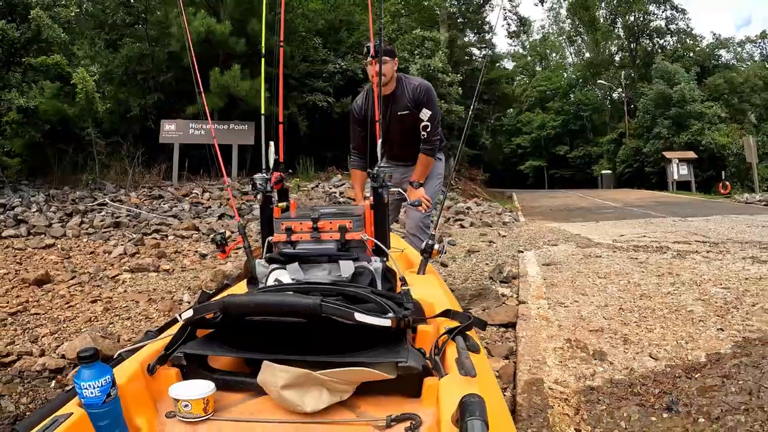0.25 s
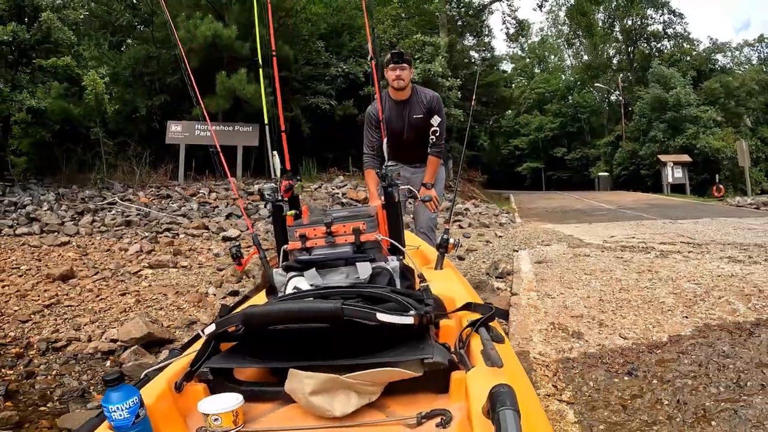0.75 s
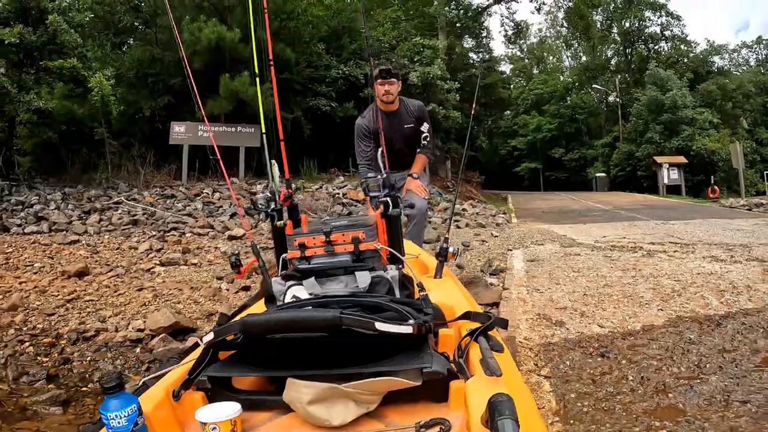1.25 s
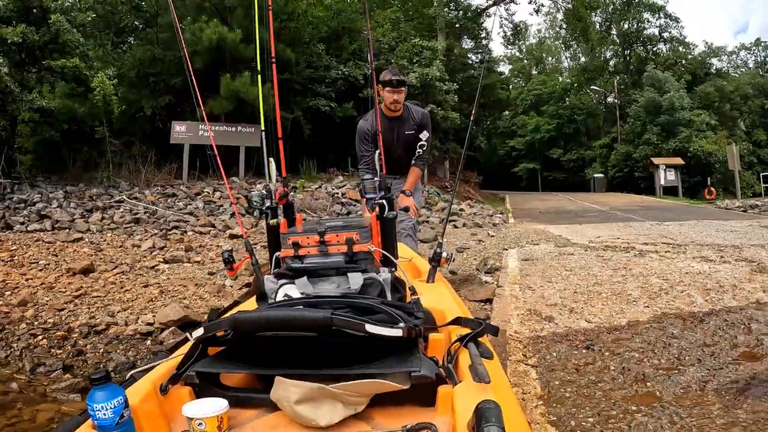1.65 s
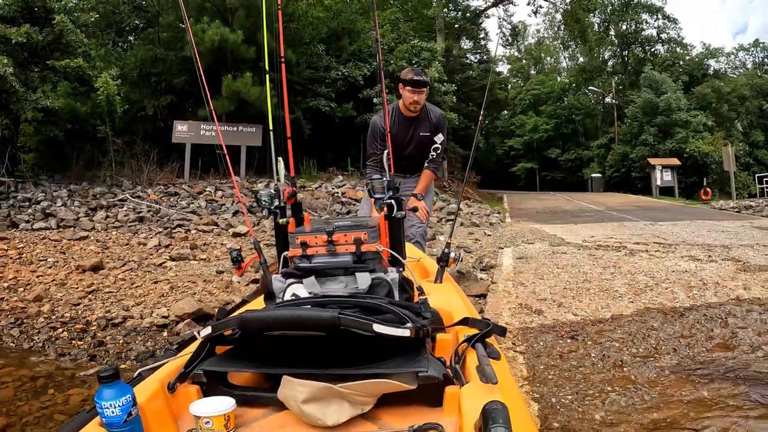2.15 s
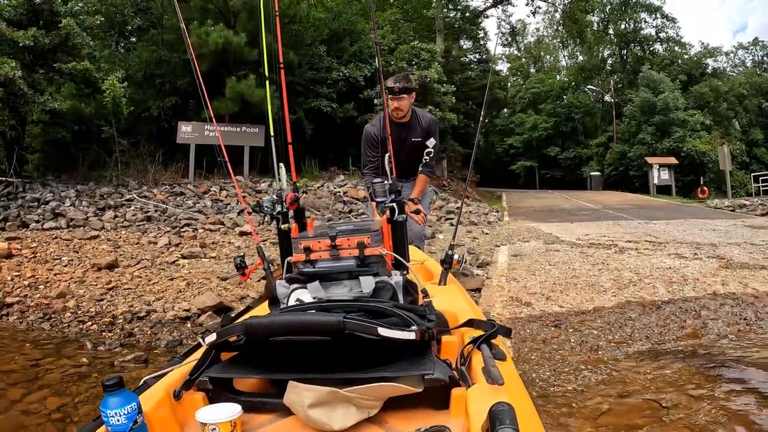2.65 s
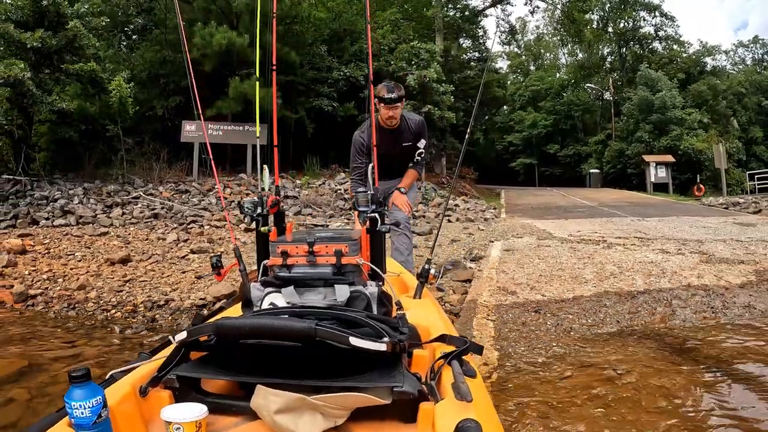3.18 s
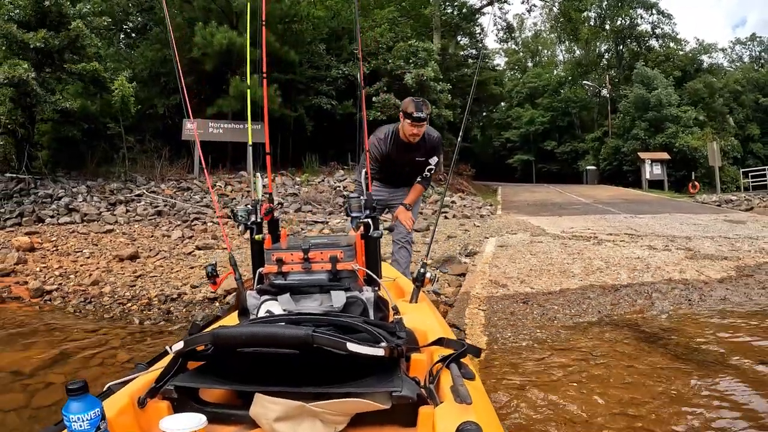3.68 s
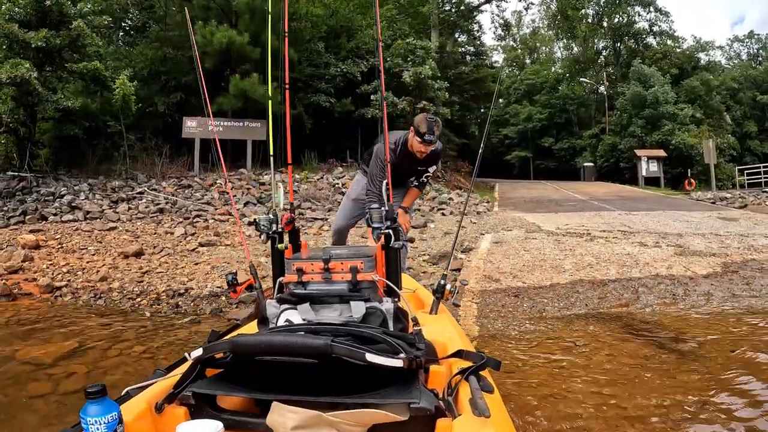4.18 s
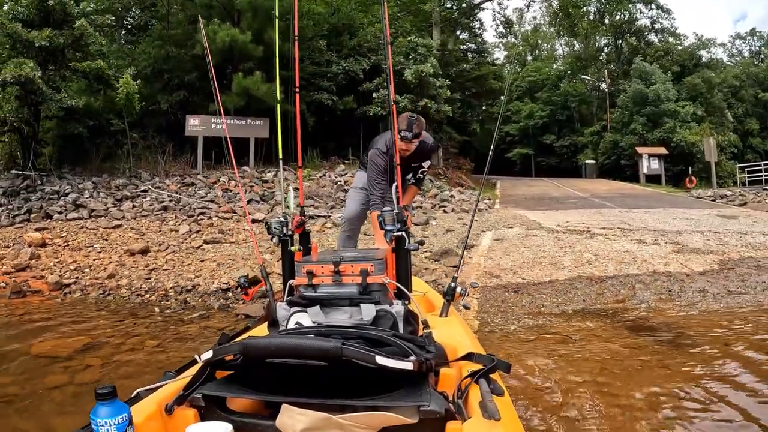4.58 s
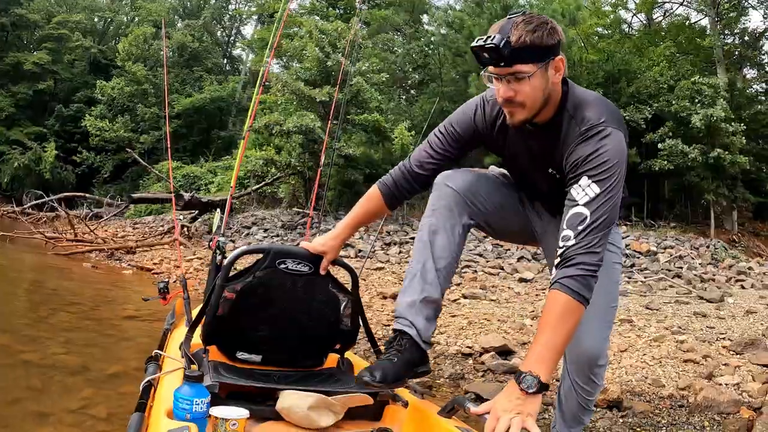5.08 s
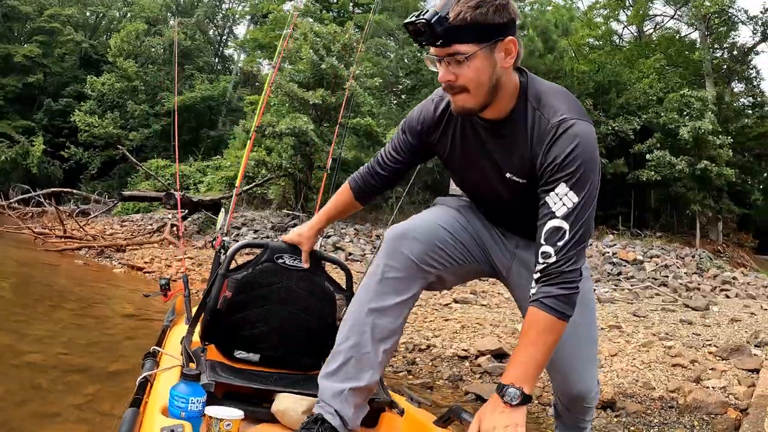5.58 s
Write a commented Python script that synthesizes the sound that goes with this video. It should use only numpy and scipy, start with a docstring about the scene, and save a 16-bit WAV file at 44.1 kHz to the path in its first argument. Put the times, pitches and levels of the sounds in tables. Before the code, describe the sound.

A loaded plastic kayak scrapes over gravel with hollow booms and clacking gear, loudest in the first second. It quietens as it slides into shallow water, which slops and plinks around wading feet between scattered knocks. Near the end a foot thumps aboard and the gear rattles. Faint insects, a cricket, a distant low hum and light wind sit behind, heard outdoors from a microphone on the hull.

```python
"""Grinding and hollow bumps: a loaded plastic kayak is dragged over gravel into shallow water.
Stones shake the modes of hull and deck, gear clacks, a foot thumps aboard.
Water slops round the wading feet and its bubbles plink.
Behind are a cricket, an insect chorus, a far low hum and light wind on the hull-mounted microphone."""
import sys
import numpy as np
from scipy.fft import rfft, irfft, next_fast_len
from scipy.io import wavfile
from scipy.ndimage import map_coordinates

SR = 44100
rng = np.random.default_rng(int(sys.argv[2]) if len(sys.argv) > 2 else 0)


def waveform_to_disk(signal):
    """Save audio, clipped to [-1, 1], as 16-bit WAV at the path in sys.argv[1]."""
    frames = np.transpose(np.atleast_2d(signal))
    scaled = np.clip(frames, -1, 1) * 32767
    samples = np.round(scaled).astype(np.int16)
    wavfile.write(sys.argv[1], SR, samples)


N = 257103

# steady load on the hull, two consecutive spans: time_s, boom_db, grind_db
HULL_LOAD = [
    [(0.0, -32.5, -54), (0.36, -23.5, -35.5), (0.64, -27, -42.5), (0.83, -31.5, -36.5), (1.04, -48.5, -59),
     (1.45, -59, -74), (1.71, -59.5, -78), (2.01, -50.5, -58), (2.61, -55.5, -75.5), (2.77, -47, -54.5),
     (3.04, -54, -67.5), (3.42, -60.5, -70), (3.67, -50, -59), (4.09, -54.5, -71), (4.5, -51, -56),
     (4.81, -40.5, -57.5)],
    [(4.81, -45.5, -56), (4.906, -47.5, -57.5), (5.044, -42.5, -55), (5.328, -43.5, -69), (5.428, -44, -57),
     (5.516, -40, -57), (5.74, -44.5, -52.5), (5.83, -43.5, -49)],
]
# hull lurching over stones: start_s, boom_db, grind_db, rise_s, boom_t60_s, mic_jolt_db
HULL_LURCHES = [(0.027, 1, -21.5, 0.0067, 0.53, -23), (0.099, -12.5, -25, 0.013, 0.11, -21),
                (0.249, -18, -33.5, 0.012, 0.23, -25), (0.336, -2.5, -28.5, 0.012, 0.3, -29),
                (0.384, -13.5, -27.5, 0.015, 0.46, -36.5), (0.432, -8.5, -19.5, 0.0086, 0.25, -33.5),
                (0.498, -21, -31.5, 0.0066, 0.28, -36), (0.644, -13, -28, 0.012, 0.22, -40.5),
                (0.707, 1.5, -15.5, 0.0047, 0.25, -36.5), (0.742, 0.5, -25.5, 0.012, 0.22, -38),
                (0.789, -14.5, -42, 0.0048, 0.2, -37), (0.96, -17.5, -35, 0.01, 0.31, -35),
                (1.358, -50, -52.5, 0.01, 0.27, -53), (1.72, -50, -65, 0.012, 0.25, -42.5),
                (1.99, -34, -62, 0.012, 0.25, -56), (2.066, -56, -63, 0.012, 0.21, -50),
                (2.168, -40, -69, 0.015, 0.2, -35.5), (2.449, -38, -74, 0.0091, 0.17, -41.5),
                (2.611, -13.5, -48, 0.021, 0.4, -32.5), (2.741, -36.5, -61, 0.0069, 0.23, -49.5),
                (2.85, -27, -42.5, 0.005, 0.4, -50.5), (2.999, -36, -71, 0.012, 0.49, -46.5),
                (3.148, -40, -48.5, 0.01, 0.16, -43.5), (3.479, -39, -45.5, 0.033, 0.75, -49.5),
                (3.923, -21, -40.5, 0.0043, 0.75, -51), (3.999, -34.5, -38, 0.013, 0.15, -51),
                (4.049, -36, -62, 0.012, 0.21, -51), (4.209, -16, -35, 0.014, 0.35, -52.5),
                (4.244, -26, -43.5, 0.0093, 0.2, -47.5), (4.337, -39, -42, 0.0052, 0.3, -49),
                (4.496, -47, -50, 0.011, 0.086, -57.5), (4.556, -10.5, -58, 0.0091, 0.25, -48.5),
                (4.639, -23.5, -49.5, 0.012, 0.25, -34.5), (4.698, -13.5, -63, 0.0086, 0.35, -34.5),
                (4.738, -19.5, -40, 0.012, 0.25, -32.5), (4.778, -15.5, -36, 0.0078, 0.39, -30.5),
                (4.939, -27.5, -43.5, 0.012, 0.53, -32.5), (5.169, -25, -46.5, 0.023, 0.38, -50.5),
                (5.309, -26, -66, 0.017, 0.23, -51.5), (5.401, -12.5, -28.5, 0.012, 0.23, -45.5),
                (5.449, -10, -31, 0.0076, 0.16, -49), (5.587, -18.5, -33.5, 0.013, 0.18, -49),
                (5.789, -20, -29.5, 0.016, 0.25, -42.5)]
# blows on the hull: start_s, level_db, panel_hz, t60_s, rap_relative_db
HULL_BLOWS = [(0.024, 4, 322, 0.034, -21), (0.044, -3.5, 181, 0.15, -18), (0.101, -10, 62.3, 0.3, -7),
              (0.257, -15.5, 61.9, 0.23, -2), (0.353, -12.5, 97.2, 0.12, -13),
              (0.372, -3.5, 119.3, 0.16, -22), (0.435, -8, 237.4, 0.19, -5), (0.5, -15, 216, 0.21, -17),
              (0.636, -15.5, 125.2, 0.11, -1), (0.708, -0.5, 189, 0.12, 1), (0.745, -7, 172, 0.18, 10),
              (0.762, -10, 75.1, 0.11, -26), (0.797, -8.5, 102, 0.18, -30), (0.977, -22.5, 62.3, 0.08, -17),
              (2.06, -31, 201, 0.14, -17), (2.616, -11, 62.1, 0.39, -22), (2.63, -14, 87.6, 0.12, -41),
              (2.665, -21.5, 134, 0.085, -36), (2.854, -33, 463, 0.16, -23),
              (3.133, -28.5, 158, 0.061, -13), (3.533, -31.5, 465, 0.037, 14.5),
              (3.931, -24.5, 490, 0.12, -26), (3.966, -35.5, 72.7, 0.11, -12),
              (3.998, -22.5, 468, 0.047, -17), (4.216, -29, 188, 0.062, -13),
              (4.238, -27.5, 96.9, 0.1, -25), (4.558, -19, 194.5, 0.23, -23), (4.597, -17, 179, 0.11, -37),
              (4.643, -23, 133, 0.19, -16), (4.7, -23.5, 62.2, 0.11, -34), (4.745, -15.5, 98, 0.14, -34),
              (4.769, -11.5, 62.6, 0.18, -13), (4.8, -18.5, 91, 0.055, -24),
              (4.946, -23.5, 65.5, 0.53, -19), (4.96, -29, 61.9, 0.15, -18), (5.188, -34.5, 223, 0.21, -24),
              (5.309, -24, 315.4, 0.11, -5), (5.349, -24.5, 307, 0.11, -26), (5.407, -9, 95, 0.12, 2.5),
              (5.434, -7.5, 159.3, 0.075, -16), (5.459, -18, 246, 0.087, 7.5),
              (5.474, -24.5, 160, 0.24, -13), (5.596, -15.5, 163, 0.13, -4), (5.8, -23.5, 190, 0.12, -16)]
# resonances of hull, deck and pebbles: centre_hz, width_hz, gain_db
HULL_MODES = [(68.5, 51, -3.5), (105.4, 71, -1), (187.3, 59.3, -1), (244.3, 81, -4.5), (310, 69, -8.5)]
DECK_MODES = [(369.3, 80, 1), (514, 79, 1), (604.5, 101, -2), (803, 247, -13.5), (981, 170, -11),
              (1346, 230, -18.5), (2013, 67, -19.5)]
PEBBLE_MODES = [(910, 200, 7.5), (1580, 180, -1), (2050, 130, -20.5), (2450, 150, -6), (3370, 140, -20)]
# brief dip in hull sound and wind: time_s, gain_db
RUMBLE_DIP = [(0, 0), (4.806, 0), (4.811, -24), (4.85, -12), (4.89, 0), (5.83, 0)]
# steady stir of gravel and water, two consecutive spans: time_s, slosh_db, fizz_db
STIR_FLOOR = [
    [(0.0, -61, -68), (0.2, -52, -60), (0.87, -54, -66.5), (1.02, -70, -75), (1.67, -80, -81.5),
     (2.0, -58, -67.5), (2.46, -68, -73.5), (3.21, -64.5, -69), (3.62, -60, -67.5), (4.31, -67, -65.5),
     (4.53, -68.5, -73), (4.81, -71, -72)],
    [(4.81, -59, -66), (4.932, -55, -63), (4.99, -51.5, -63), (5.078, -54.5, -63.5), (5.186, -54, -64),
     (5.44, -67, -69.5), (5.5, -78, -70), (5.624, -52.5, -61.5), (5.83, -56.5, -61)],
]
# crunches and splashes: start_s, slosh_db, fizz_db, rise_s, slosh_t60_s
STIR_BURSTS = [(0.0247, -29, -45.5, 0.036, 0.26), (0.0998, -33, -45.5, 0.0059, 0.2),
               (0.3531, -33, -54, 0.0061, 0.42), (0.4348, -36.5, -52, 0.01, 0.18),
               (0.6544, -39.5, -61.5, 0.012, 0.14), (0.7086, -18, -43.5, 0.004, 0.071),
               (0.7445, -30, -54, 0.015, 0.18), (0.9554, -32.5, -62.5, 0.0096, 0.12),
               (1.0032, -39, -56.5, 0.017, 0.11), (1.202, -50.5, -74, 0.015, 0.2),
               (1.3733, -60.5, -85, 0.0072, 0.166), (1.8092, -42.5, -62.5, 0.018, 0.24),
               (1.8612, -42, -64, 0.012, 0.19), (1.9857, -40.5, -68, 0.017, 0.35),
               (2.0594, -42, -61, 0.0095, 0.07), (2.174, -58, -72, 0.012, 0.18),
               (2.349, -52, -60.5, 0.0045, 0.12), (2.3955, -52, -63, 0.012, 0.23),
               (2.596, -40.5, -69, 0.016, 0.25), (2.9494, -41, -69, 0.011, 0.37),
               (3.1752, -66, -61, 0.0063, 0.095), (3.3563, -46.5, -58, 0.012, 0.22),
               (3.475, -31, -49, 0.014, 0.47), (3.4974, -22, -48.5, 0.015, 0.14),
               (3.532, -19, -63, 0.01, 0.16), (3.5783, -39, -67.5, 0.0069, 0.53),
               (3.9609, -37.5, -62, 0.019, 0.18), (4.0394, -44, -57, 0.012, 0.16),
               (4.217, -42, -49.5, 0.01, 0.13), (4.2944, -45, -57, 0.017, 0.5),
               (4.9611, -35, -70, 0.014, 0.18), (5.4047, -29.5, -51, 0.018, 0.18),
               (5.4465, -29, -37.5, 0.0075, 0.14), (5.5835, -31.5, -44, 0.011, 0.12),
               (5.5953, -28, -49.5, 0.0085, 0.15), (5.6501, -39, -57, 0.019, 0.066),
               (5.7673, -46.5, -71, 0.012, 0.14), (5.798, -34.5, -51, 0.019, 0.2)]
# stone and gear hits: start_s, level_db, pitch_hz, treble_relative_db, left_over_right_db,
# upper_hz, upper_relative_db, crack_relative_db
GEAR_HITS = [(0.025, -30.5, 823, 0, 6, 1570, -10, 3), (0.052, -26.5, 780, -1, -5, 1810, -2, -12.5),
             (0.098, -26.5, 667, -5.5, 10.5, 2006, -0.5, -4.5),
             (0.113, -30, 840, -6, -3.5, 1600, -4.5, -10), (0.188, -37.5, 730, 0, -4, 1810, -4, -4),
             (0.217, -28, 750, -24, -2.5, 2040, -5.5, 4.5), (0.26, -28.5, 797, -27, 10, 2130, -16, -14),
             (0.282, -33, 885, -28, 5, 1650, -16.5, -2), (0.315, -55.5, 912, 5, 7, 1990, -16, -9),
             (0.366, -27.5, 940, -11, 7.5, 2013, 2, -10), (0.403, -24, 696, -17.5, 5, 1910, -13, -3.5),
             (0.435, -16, 955, -18.5, 4, 1670, -41, -7.5), (0.501, -28, 703, -25, 3.5, 1930, -5, 1),
             (0.525, -33.5, 856, -19, 1.5, 1700, -10.5, 2),
             (0.659, -27.5, 1490, -36, 1.5, 1520, -11.5, -15),
             (0.694, -26, 1450, -21.5, 1.5, 1546, -23.5, -1.5),
             (0.707, -14, 862, -24, 1.5, 1950, -11, -1.5), (0.721, -17.5, 1030, -22, -3, 1660, -21, -6),
             (0.745, -11, 910, -20.5, 3.5, 1696, -24, -4), (0.763, -19.5, 759, -21.5, -2.5, 1900, -26, -6),
             (0.793, -33.5, 707, -22, 0.0, 2410, -1.5, -5.5), (0.804, -32.5, 735, -17.5, 3, 1970, -0.5, 4),
             (0.825, -38, 712, -2.5, 0.0, 1580, -18, 12), (0.888, -25, 1095, -24, 0.0, 1700, -24, -15),
             (0.91, -32, 1016, -8, -2.5, 2480, -14, -6), (0.951, -35, 983, -17, 4.5, 1910, -19, 3.5),
             (0.966, -40, 789, -19, -0.5, 1820, 0, -1), (1.009, -42, 680, -9, -0.5, 1660, -16, -1),
             (1.201, -40.5, 1240, -31, 0.0, 1550, -31, -13), (1.373, -41.5, 1120, -13, 0.0, 1550, -29, -9),
             (2.002, -77, 1340, -12, -5, 1710, -19, -3), (2.068, -43, 1220, -5, -2.5, 2060, -9, 6),
             (2.34, -53, 1470, 3, -1, 1660, 1, -3), (2.395, -40.5, 1280, -10, 9, 2300, -6, 1),
             (2.422, -55.5, 1390, -2, 5, 1660, 9.5, -3), (2.473, -63, 1560, -7, 0.0, 2360, -4, -3),
             (2.61, -38.5, 700, -20, 1.5, 1780, -14, -3), (2.853, -40, 1110, -36, 1, 1650, -5, -3),
             (3.089, -43.5, 1090, -35, 2, 1550, -16, 2), (3.175, -57, 1050, -8, 9, 3020, 8, -6),
             (3.473, -45, 937, -1, -6, 1750, -14, -3), (3.496, -31.5, 736, -9, 0.5, 1980, -1, -15),
             (3.507, -35.5, 1010, -28, -1.5, 2220, 6, 10), (3.533, -18, 1040, -33, -1, 1660, -7.5, 0.5),
             (3.542, -31.5, 1127, -43, 1.5, 1710, 1, 0), (3.56, -28, 1100, -24, -5.5, 2190, -8, -12),
             (3.577, -24.5, 1070, -32, 0.5, 1620, -25, -6), (3.961, -26, 1120, -21, 1.5, 1800, -19, -11),
             (4.045, -66.5, 1250, -6, 0.5, 1990, 9, 2), (4.218, -35, 867, -13, 2, 1480, -11, 5),
             (4.231, -48, 729, -21, -8, 1980, -25, -9), (4.961, -29, 1194, -28, -6.5, 1700, -31, -11),
             (4.972, -27, 1107, -28, -2, 1670, -25, -16), (5.405, -24.5, 675, -4.5, 1, 1734, -2.5, 3),
             (5.453, -29.5, 707, 7, -0.5, 1590, -8.5, 11), (5.465, -30, 680, -7, 2.5, 1880, -17, 8),
             (5.472, -38, 686, -14, -3.5, 1840, -25, 15), (5.573, -41.5, 926, -2, 0.5, 2680, 0, 7),
             (5.583, -35, 1456, 3, -1, 1480, -3, 11), (5.597, -25, 1370, -15.5, 8, 2160, -1.5, 7),
             (5.755, -40, 1220, 8.5, 1, 1920, -6, -3), (5.798, -33.5, 700, -26, 5, 1530, 0, 1)]
# bubbles: start_s, level_db, pitch_hz, rise_octaves_per_life, life_s
BUBBLES = [(1.157, -62, 1430, 0.18, 0.009), (1.275, -62, 1533, 0.18, 0.011),
           (1.688, -64.5, 1150, 0.15, 0.038), (1.711, -61, 770, 0.24, 0.024),
           (1.82, -57, 2680, 0.065, 0.047), (1.862, -43, 1390, 0.09, 0.0042),
           (1.908, -50, 1420, 0.059, 0.017), (1.945, -57, 1890, .1, .01), (1.973, -41, 782, 1.1, 0.031),
           (1.976, -61, 1530, 0.054, 0.0078), (2.13, -55, 2000, 0.088, 0.0071),
           (2.176, -51, 1310, .1, 0.014), (2.174, -53, 2220, 0.091, 0.016), (2.425, -53, 1740, 0.12, 0.013),
           (2.454, -49.5, 1320, 0.088, 0.0087), (2.472, -56, 2350, 0.12, .01),
           (2.489, -57.5, 2510, .1, 0.0077), (2.553, -55.5, 1580, 0.12, 0.012),
           (2.56, -59.5, 2740, .05, 0.0088), (2.596, -53, 2740, 0.081, 0.0098),
           (2.952, -53, 2020, 0.066, 0.017), (3.147, -53.5, 2300, .05, .012), (3.73, -46.5, 765, .1, 0.011),
           (3.78, -51, 2000, .1, 0.0097), (3.812, -54, 1450, 0.093, 0.019), (4.046, -53.5, 3350, .05, .012),
           (4.253, -48, 2590, .05, 0.0093), (4.257, -56, 3550, 0.069, 0.031),
           (4.301, -44, 2610, .03, 0.0051), (4.321, -48, 2560, 0.027, 0.026),
           (4.385, -41.5, 653, .05, 0.027), (4.411, -41.5, 3300, .03, 0.004), (4.44, -46, 472, .05, 0.023),
           (4.449, -57, 1930, 0.13, 0.021), (4.461, -55.5, 2340, .05, 0.018),
           (4.498, -36, 656, 0.093, 0.017), (4.509, -55, 2650, 0.046, 0.02),
           (4.687, -58.5, 3530, .03, 0.0093), (4.75, -55.5, 2770, 0.069, 0.0098),
           (4.785, -42, 709, 0.045, 0.036), (5.058, -45.5, 421, 1.88, 0.089),
           (5.145, -39, 1260, 0.084, 0.0056), (5.383, -42, 1990, 0.38, 0.01),
           (5.47, -26, 704, 0.021, 0.022), (5.619, -62, 1630, .05, 0.013), (5.70, -40, 1880, .05, 0.0036),
           (5.73, -47.5, 692, 0.043, 0.041), (4.817, -51, 3230, .05, 0.01), (3.40, -54, 860, .1, 0.012),
           (4.036, -56, 1010, .05, 0.011)]
# one cricket: time_s, level_db, left_over_right_db
CRICKET_LEVEL = [(0, -74.5, 6), (1, -84.5, 3), (1.8, -78, 10), (2.6, -72, -1), (3, -80.5, 9),
                 (3.8, -77.5, 18), (4.3, -68, 7.5), (4.8, -69, 9), (4.81, -120, 6)]
# insect chorus, two consecutive spans: time_s, level_db
INSECT_LEVEL = [
    [(0.0, -66.5), (0.99, -79), (1.94, -70), (4.65, -67), (4.81, -65)],
    [(4.81, -76), (5.008, -74), (5.426, -65.5), (5.83, -87)],
]
# wind and hum: time_s, level_db
WIND_LEVEL = [(0.0, -40.5), (0.24, -26), (1.01, -46), (1.38, -62.5), (1.61, -62), (1.91, -52),
              (2.71, -42.5), (2.84, -50), (3.52, -47.5), (3.72, -45), (4.56, -63), (4.81, -49), (5.13, -51),
              (5.83, -45.5)]
HUM_LEVEL = [(0, -47), (1.1, -56.5), (1.45, -56), (1.9, -55), (2.2, -58.5), (2.5, -54.5), (3, -63),
             (3.35, -63.5), (3.6, -47), (3.9, -47), (4.1, -52), (4.45, -52), (4.8, -41), (4.82, -80),
             (5.83, -81)]
# noise spectra and microphone response: frequency_hz, gain_db
SLOSH_SPECTRUM = [(290, -44), (500, -30.5), (757, -2), (809, -2), (1060, -10), (1170, 1), (1640, 2.5),
                  (5000, -19.5), (6500, -41), (11000, -120)]
FIZZ_SPECTRUM = [(2500, -2.5), (3500, -4), (5000, -5.5), (7000, -7.5), (9000, -17.5), (13000, -2),
                 (15500, -53.5)]
INSECT_SPECTRUM = [(6500, -44.5), (7050, -16.5), (7400, -0.5), (7900, -1.5), (8300, -10), (8700, -20.5),
                   (8900, -52.5)]
WIND_SPECTRUM = [(10, -24), (25, 5), (45, 1), (90, -35), (200, -69)]
MIC_RESPONSE = [(1, -2), (9000, -1), (13000, -17), (14200, -10), (16000, -20.5)]
# stereo width, scaled per source: time_s, side_ratio
STEREO_WIDTH = [(0, 0.63), (.6, 0.16), (.75, 0), (3.2, .08), (3.7, 0.24), (5.83, 0.25)]


def hull_drag(spread):
    """Stones catching under the hull shake its low modes and, more briefly, the deck."""
    boom_db, grind_db = layer_levels(HULL_LOAD, HULL_LURCHES)
    boom = shaken(grit(260, 5.1, smooth=0.66), boom_db, dull(modes(HULL_MODES), 680))
    grind = shaken(grit(300, 5.3, smooth=0.39), grind_db, dull(modes(DECK_MODES), 2600))
    return wide(boom, spread) + wide(grind, 0.7 * spread)


def hull_thumps(contact_s=0.0011):
    """Each blow rings the struck panel and a neighbour, kicks the whole hull and raps the deck."""
    panels, kicks, raps = np.zeros((2, N + SR)), np.zeros(N + SR), np.zeros(N + SR)
    t = np.arange(SR // 3) / SR
    push = np.hanning(round(contact_s * SR))
    for start_s, db, panel_hz, t60_s, rap_db in HULL_BLOWS:
        neighbour = sine(panel_hz * rng.normal(1.6, 0.063), t)
        lean = rng.normal(0, 0.099)
        fade = amp(db - 3.5 - 60 * t / t60_s) * (1 - np.exp(-t / 0.0027))
        add(panels, start_s, fade * (wide([sine(panel_hz, t), neighbour], lean) + 0.22 * neighbour))
        add(kicks, start_s, amp(db + 10.5) * push)
        add(raps, start_s, amp(db + rap_db + 1.5) * push)
    hull = filtered(kicks[:N], dull(modes(HULL_MODES), 600))
    deck = filtered(raps[:N], dull(modes(DECK_MODES), 2300))
    return panels[:, :N] + hull + deck


def gravel_and_water(spread):
    """A fluttering, bubbly wash under fizz and spits; knocking pebbles give way to gurgles."""
    slosh_db, fizz_db = layer_levels(STIR_FLOOR, STIR_BURSTS)
    ashore = np.interp(np.arange(N) / SR, [1.0, 1.1], [1, 0])
    flutter = wobble(28)
    wash = unit(amp(3.43 * flutter) * filtered(grit(820, 7.9, smooth=1.0), colour(SLOSH_SPECTRUM)))
    bubbles = amp(-2.5) * bubble_cloud(260, 1681, octaves=1.1, cycles=24, rise=0.42, scatter_db=1.0)
    shimmer = amp(1.5 * flutter + 2 * wobble(70))
    pebbles = amp(-5) * unit(filtered(grit(240, 3.3, smooth=0.12), dull(modes(PEBBLE_MODES), 4200)))
    gurgle = amp(-7.5) * bubble_cloud(120, 850, octaves=0.7, cycles=9, rise=0.28, scatter_db=2.5)
    slosh = wash + bubbles + ashore * pebbles + (1 - ashore) * gurgle
    fizz = unit(shimmer * filtered(grit(1200, 2.5, smooth=0.5), colour(FIZZ_SPECTRUM)))
    spits = amp(-8.5) * bubble_cloud(120, 4830, octaves=0.87, cycles=11, rise=0.3, scatter_db=6)
    return amp(slosh_db) * wide(slosh, 1.2 * spread) + amp(fizz_db) * wide(fizz + spits, 1.4 * spread)


def gear_clacks(tick_mid_hz=4390, tick_scatter_octaves=0.3):
    """Struck stones and gear give two short rings, a crack and a sharp pitched tick."""
    rings, cracks, ticks = np.zeros((3, 2, N + SR))
    t = np.arange(SR // 20) / SR
    attack = 1 - np.exp(-t / 0.00029)

    def fade(db, t60_s):
        return amp(db - 60 * t / t60_s)

    for start_s, db, hz, treble_db, pan_db, upper_hz, upper_db, crack_db in GEAR_HITS:
        gain = amp([[db + pan_db / 2], [db - pan_db / 2]])
        tick_hz = tick_mid_hz * 2 ** rng.normal(0, tick_scatter_octaves)
        lower = fade(-2, 0.032) * sine(hz, t)
        upper = fade(upper_db - 1.5, 0.028) * sine(upper_hz, t)
        ping = fade(treble_db - 14, 0.026) * sine(tick_hz, t)
        crack_noise, tick_noise = rng.standard_normal((2, 2, len(t)))
        add(rings, start_s, gain * attack * (lower + upper + ping))
        add(cracks, start_s, gain * fade(crack_db, 0.022) * wide(crack_noise, 0.1))
        add(ticks, start_s, gain * fade(treble_db - 2.5, 0.018) * wide(tick_noise, 0.38))
    cracks = filtered(cracks[:, :N], band(680, 2600))
    ticks = filtered(ticks[:, :N], band(3200, 7400))
    return rings[:, :N] + cracks + ticks


def bubble_plinks(shiver_ratio=0.042):
    """A bubble's pitch rises unsteadily as it nears the surface, where it bursts."""
    out, t = np.zeros(N + SR), np.arange(SR // 8) / SR
    shiver, tremble = np.pad([wobble(300), wobble(400)], ((0, 0), (0, SR)))
    attack = 1 - np.exp(-(t / 0.00043) ** 2)
    for start_s, db, hz, rise_octaves, life_s in BUBBLES:
        age = t / life_s
        span = round(start_s * SR) + np.arange(len(t))
        pitch_hz = hz * 2 ** (rise_octaves * np.minimum(age, 1.2)) * (1 + shiver_ratio * shiver[span])
        fade = amp(db - 4 * age - 10 * age ** 6 + 2.5 * tremble[span])
        add(out, start_s, attack * fade * glide(pitch_hz))
    return out[:N]


def cricket(stroke_hz=24.28, note_hz=8560, droop_hz=450):
    """Steady wing strokes: the note holds, then droops; a faint echo follows each chirp."""
    level_db, pan_db = curves(CRICKET_LEVEL)
    cycle = (stroke_hz * np.arange(N) / SR - 0.13) % 1
    droop = np.clip((cycle - 0.2) / 0.097, 0, 1) ** 2 * (cycle < 0.45)
    stroke = np.sin(np.pi * np.clip(cycle / 0.47, 0, 1)) ** 0.4
    faint_echo = 0.33 * np.sin(np.pi * np.clip((cycle - 0.46) / 0.15, 0, 1))
    envelope = (stroke + faint_echo) * amp(0.65 * wobble(22))
    note = envelope * glide(note_hz - droop_hz * droop + 40 * wobble(400))
    return amp(level_db + np.array([pan_db, -pan_db]) / 2) * unit(note)


def insect_chorus(spread):
    """Many insects merge into a flickering band of high noise."""
    level_db = curves(np.vstack(INSECT_LEVEL))[0]
    return amp(level_db) * wide(flickering_noise(INSECT_SPECTRUM, depth_db=1.14, rate_hz=33), spread)


def microphone_wind(spread, jolt_t60_s=0.8):
    """Wind rumbles on the microphone; each lurch adds a jolt."""
    jolts = [(start_s, db, rise_s, jolt_t60_s) for start_s, _, _, rise_s, _, db in HULL_LURCHES]
    level_db = bursts(curves(WIND_LEVEL)[0], jolts) + curves(RUMBLE_DIP)[0]
    return amp(level_db) * wide(flickering_noise(WIND_SPECTRUM, depth_db=0.83, rate_hz=30), spread)


def distant_hum(pitch_hz=164, drift_hz=3.73, waver_db=2.5):
    """One low tone wavering in level and pitch."""
    tone = amp(waver_db * wobble(15)) * glide(pitch_hz + drift_hz * wobble(21))
    return amp(curves(HUM_LEVEL)[0]) * unit(tone)


def bubble_cloud(rate_hz, mid_hz, octaves, cycles, rise, scatter_db):
    """Random bubbles as damped, rising sines; mid and side streams."""
    t = np.arange(SR // 50) / SR
    when, pitch, strength, place = rng.random((int(rate_hz * N / SR), 4)).T[..., None]
    hz = np.clip(mid_hz * 2 ** (octaves * (2 * pitch - 1)), 100, 14000)
    age = t * hz / cycles
    size = amp(-scatter_db * np.log(strength + 0.039)) * np.sqrt(mid_hz / hz)
    waves = size * np.exp(-3 * age) * (1 - np.exp(-30 * age)) * sine(hz * (1 + rise * age / 2), t)
    index = ((when * N).astype(int) + np.arange(len(t))).ravel()
    mid, side = (np.bincount(index, (waves * gain).ravel(), N + SR)[:N] for gain in (1, 2 * place - 1))
    return np.array([mid, side]) / np.std(mid)


def grit(rate_hz, scatter_db, smooth):
    """Two streams of sparse impulses of scattered size over a share of smooth noise."""
    hits = rng.random((2, N)) < rate_hz / SR
    sizes = amp(scatter_db * np.minimum(rng.exponential(size=(2, N)), 3))
    signs = rng.choice([-1, 1], (2, N))
    return unit(hits * sizes * signs) + smooth * rng.standard_normal((2, N))


def flickering_noise(spectrum, depth_db, rate_hz):
    return unit(amp(depth_db * wobble(rate_hz)) * filtered(rng.standard_normal((2, N)), colour(spectrum)))


def shaken(force, level_db, response):
    """A body driven by a force of varying level rings on in its own modes."""
    return filtered(amp(level_db) * force, response) / np.std(filtered(force[0], response))


def layer_levels(steady, events, crest_db=13, high_t60_ratio=0.75):
    """Low and high layer of a source in dB: steady curves plus bursts."""
    low_db, high_db = curves(np.vstack(steady))
    low = [(s, db - crest_db, rise_s, t60_s) for s, db, _, rise_s, t60_s, *_ in events]
    high = [(s, db, rise_s, high_t60_ratio * t60_s) for s, _, db, rise_s, t60_s, *_ in events]
    return bursts(low_db, low), bursts(high_db, high)


def bursts(floor_db, events):
    """Level in dB of a floor plus swelling, dying bursts, summed in power."""
    power, t = np.pad(amp(2 * floor_db), (0, SR)), np.arange(SR) / SR
    for start_s, db, rise_s, t60_s in events:
        envelope = np.minimum(t / rise_s, 1) * amp(db - 60 * np.maximum(t - rise_s, 0) / t60_s)
        add(power, start_s, envelope ** 2)
    return 10 * np.log10(power[:N])


def modes(rows):
    """Causal response of resonances with alternating signs."""
    return lambda f: sum((-1) ** k * amp(db) * 1j * f * width_hz / (hz * hz - f * f + 1j * f * width_hz)
                         for k, (hz, width_hz, db) in enumerate(rows))


def dull(response, corner_hz):
    """Two-pole low-pass: little passes above a body's modes."""
    return lambda f: response(f) / (1 + 1j * f / corner_hz) ** 2


def band(low_hz, high_hz):
    return lambda f: modes([(np.sqrt(low_hz * high_hz), high_hz - low_hz, 0)])(f) ** 2


def colour(points):
    """Gain on a log frequency axis, silent outside the points."""
    hz, db = np.transpose(points)
    return lambda f: amp(np.interp(np.log(f + 1), np.log(hz + 1), db, left=-120, right=-120))


def filtered(x, response):
    size = next_fast_len(N + SR // 2)
    return irfft(rfft(x, size) * response(np.fft.rfftfreq(size, 1 / SR)), size)[..., :N]


def curves(rows):
    """Each column after time_s, interpolated per sample."""
    time_s, *columns = np.transpose(rows)
    return [np.interp(np.arange(N) / SR, time_s, column) for column in columns]


def wobble(rate_hz):
    """Smooth random curve with knots at rate_hz."""
    knots = rng.standard_normal(int(N * rate_hz / SR) + 4)
    return map_coordinates(knots, [np.arange(N) * rate_hz / SR])


def wide(pair, spread):
    """Mid and side to left and right."""
    mid, side = pair
    return np.array([mid + spread * side, mid - spread * side])


def sine(hz, t):
    return np.sin(2 * np.pi * hz * t)


def glide(hz):
    return np.sin(2 * np.pi * np.cumsum(hz) / SR)


def amp(db):
    return 10 ** (np.asarray(db) / 20)


def unit(x):
    return x / np.sqrt(np.mean(x ** 2) + 1e-20)


def add(track, start_s, sound):
    start = round(start_s * SR)
    track[..., start:start + sound.shape[-1]] += sound


def scene():
    """Hull, water and gear over insects, wind and hum."""
    spread = curves(STEREO_WIDTH)[0]
    water = gravel_and_water(spread)
    hull = amp(curves(RUMBLE_DIP)[0]) * (hull_drag(0.64 * spread) + hull_thumps())
    foreground = hull + water + gear_clacks() + bubble_plinks()
    background = cricket() + insect_chorus(1.8 * spread) + microphone_wind(0.5 * spread) + distant_hum()
    return foreground + background


def record(dry):
    """The microphone rounds off peaks, droops in the treble and limits the band."""
    ceiling, top_hz = 0.9, 15595
    soft = dry / (1 + np.abs(dry / ceiling) ** 4) ** (1 / 4)
    return filtered(soft, lambda hz: colour(MIC_RESPONSE)(hz) * (hz < top_hz))


dry = scene()
out = record(dry)
waveform_to_disk(out)
```